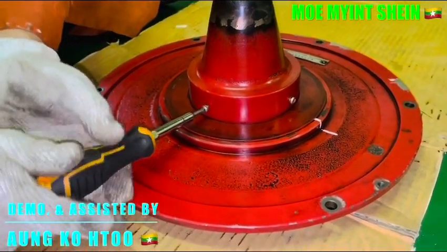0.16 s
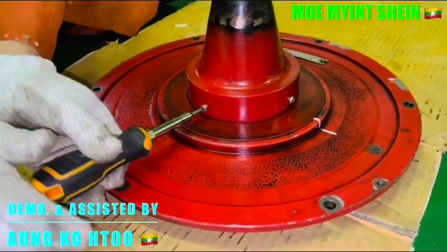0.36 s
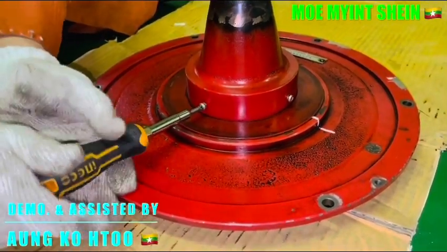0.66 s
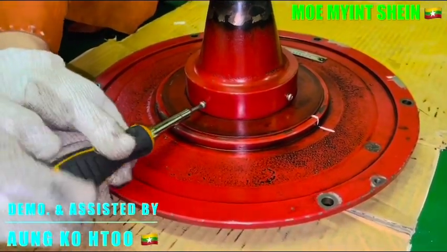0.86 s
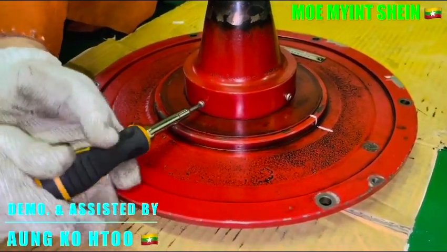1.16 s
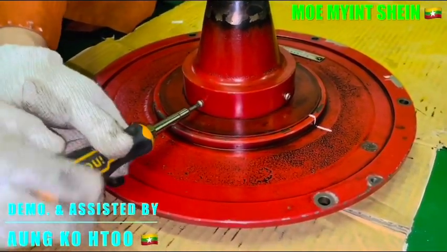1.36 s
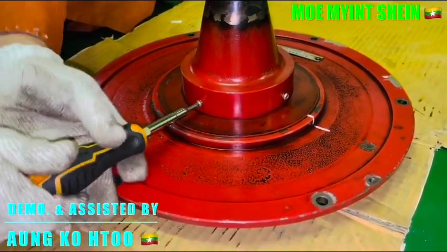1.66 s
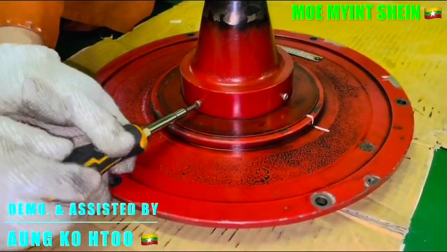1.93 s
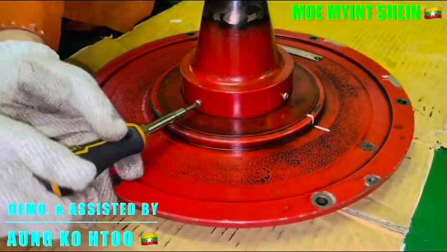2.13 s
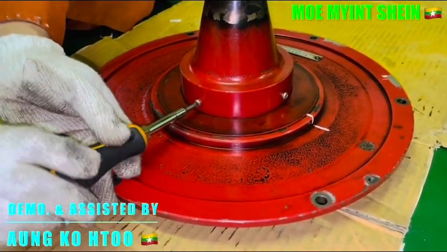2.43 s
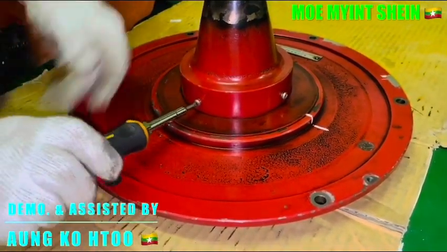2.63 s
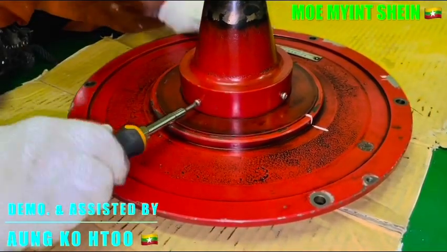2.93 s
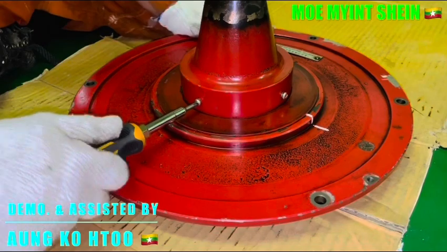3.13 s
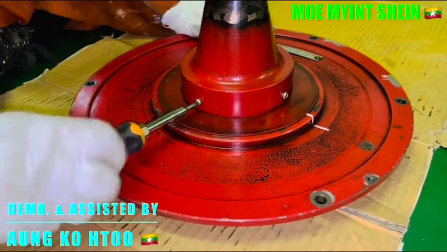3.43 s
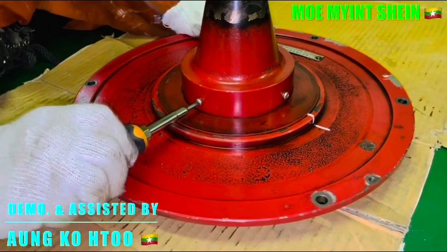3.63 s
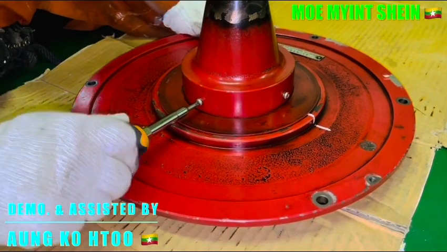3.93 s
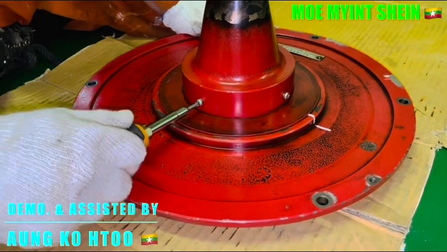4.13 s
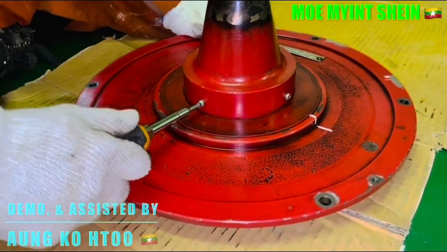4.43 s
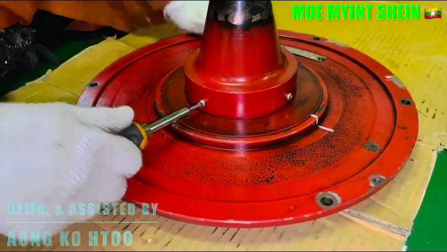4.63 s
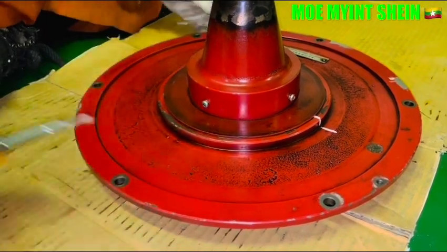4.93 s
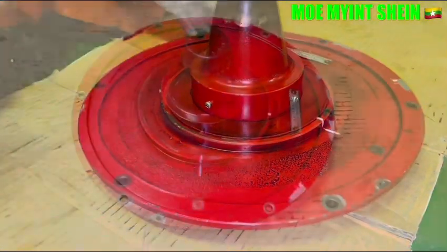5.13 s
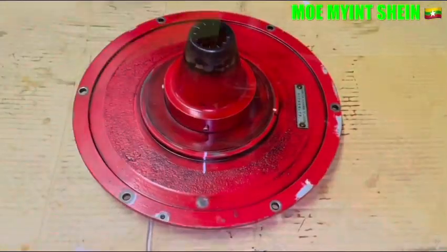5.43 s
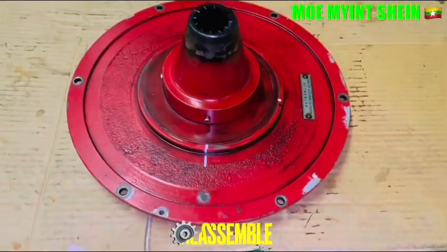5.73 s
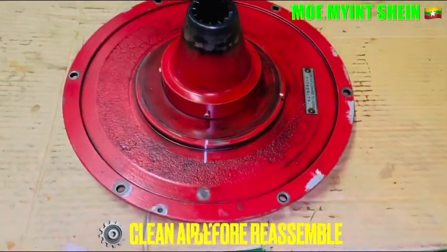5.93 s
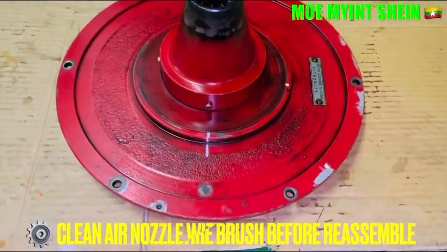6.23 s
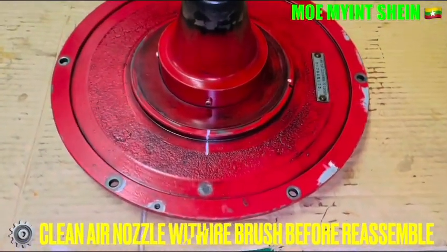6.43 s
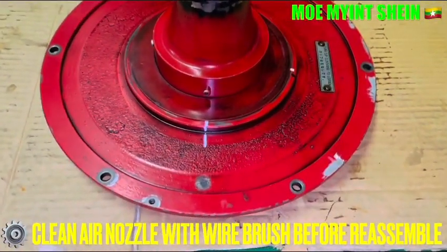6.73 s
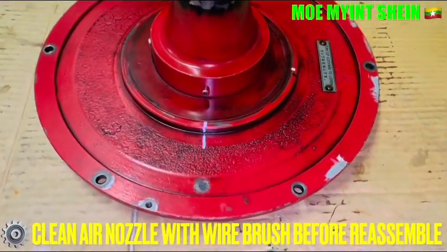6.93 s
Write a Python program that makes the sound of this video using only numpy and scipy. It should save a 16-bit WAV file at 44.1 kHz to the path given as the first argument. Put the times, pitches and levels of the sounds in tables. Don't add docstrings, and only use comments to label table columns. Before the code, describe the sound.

A steady, deep engine-room rumble with a low humming throb, dull ventilation roar and soft low duct moans, unchanged throughout.

```python
import sys
import numpy as np
from scipy import signal
from scipy.fft import rfft, irfft
from scipy.io import wavfile
from scipy.ndimage import uniform_filter1d

SR = 44100
rng = np.random.default_rng(int(sys.argv[2]) if len(sys.argv) > 2 else 0)


def magnitude_from_level(level_db):
    exponent = np.asarray(level_db, float) / 20
    return 10 ** exponent


def generate_wav(sig):
    pcm = np.round(np.clip(np.atleast_2d(sig).T, -1, 1) * 32767).astype(np.int16)
    wavfile.write(sys.argv[1], SR, pcm)


N = 312669


def read(points, hz):
    f, value = np.transpose(points)
    return np.interp(np.log(hz + 1), np.log(f + 1), value)


def noise(power_per_hz):
    spectrum = rfft(rng.standard_normal(N))
    return irfft(spectrum * np.sqrt(power_per_hz * SR / 2), N)


def bump(t, middle, width):
    return np.exp(-((t - middle) / width) ** 2)


def smooth_wander(count, span):
    wander = rng.standard_normal(count)
    for _ in range(2):
        wander = uniform_filter1d(wander, size=span)
    return wander / wander.std()


def engine():
    # order, level_db (rms)
    thump = [(4, -61.2), (5, -48.7), (6, -40.1), (7, -58.6), (8, -46.9), (9, -44.7), (10, -35.3),
             (11, -48.2), (12, -53.9), (13, -48.8), (14, -35.0), (15, -59.4), (16, -62.7), (17, -62.6),
             (18, -62.6), (19, -71.5), (20, -58.9), (21, -65.1), (22, -63.4), (23, -64.9), (24, -65.4),
             (25, -57.8), (26, -65.7), (27, -59.2), (28, -74.1), (29, -58.5), (30, -56.6), (31, -58.9)]
    # order,
    # level_db (rms)
    panels_low = [(34, -62), (36, -75), (37, -61), (38, -65.5), (39, -64), (42, -66), (45, -66),
                  (47, -67.5), (51, -68), (54, -66), (60, -69), (61, -70)]
    panels_mid = [(59, -75.5), (62, -82), (63, -73), (66, -72), (71, -74), (89, -74), (103, -76),
                  (126, -78.5), (136, -74), (140, -76.5), (144, -72.5), (151, -72), (155, -76.5)]
    panels_high = [(158, -74), (168, -78), (170, -78.5), (188, -79.5), (202, -82), (220, -81), (224, -83),
                   (227, -82), (251, -82), (372, -95), (375, -95), (379, -95), (381, -91)]
    # frequency_hz, level_db (rms)
    knock = [(250, -65.5), (330, -72), (450, -72), (560, -84.5), (640, -81), (760, -81.5), (880, -88.5),
             (1100, -84), (1400, -91), (1800, -90.5), (2050, -100), (2500, -99), (2850, -100), (3600, -108)]
    cycle_hz = 7.4814
    size = 2 ** 16
    order = np.arange(size // 2 + 1)

    real, imag = rng.standard_normal((2, len(order)))
    chance = real + 1j * imag
    knocking = irfft(magnitude_from_level(read(knock, order * cycle_hz)) * chance / np.sqrt(2), size)
    angle = 2 * np.pi * np.arange(size) / size
    firing = 1 + 0.37 * np.cos(4 * angle - 1.5) + 0.17 * np.cos(angle - 2.5)
    cycle = rfft(knocking * firing)
    cycle[(order < 32) | (order > 480)] = 0
    for k, level_db in thump + panels_low + panels_mid + panels_high:
        cycle[int(k)] = magnitude_from_level(level_db) * np.exp(1j * np.angle(chance[int(k)]))

    low = order < 16
    hz = order[low] * cycle_hz
    lag = 1.25 * (np.arctan((hz - 60) / 0.8) - np.arctan((hz - 70.5) / 0.8))
    cycle[low] = abs(cycle[low]) * np.exp(1j * (3.8 * order[low] + 2.13 - lag))
    shape = irfft(cycle, size) * size / np.sqrt(2)

    t = np.arange(N) / SR
    hunting = 0.0009 * np.cos(2 * np.pi * (t - 0.2) / 6.6)
    position = (cycle_hz * t + hunting) % 1 * size
    return np.interp(position, np.arange(size + 1), np.append(shape, shape[0]))


def pump():
    # shaft_hz, once_db (rms once a turn), twice_db (rms twice a turn), start_rad
    shaft = (59.15, -44.5, -55.2, 2.95)
    shaft_hz, once_db, twice_db, start_rad = shaft
    angle = 2 * np.pi * shaft_hz * np.arange(N) / SR + start_rad
    once = magnitude_from_level(once_db) * np.cos(angle)
    twice = magnitude_from_level(twice_db) * np.cos(2 * angle + 1)
    return np.sqrt(2) * (once - twice)


def motors():
    # frequency_hz, level_db (rms)
    tones = [(41.77, -54.3), (44.16, -52.6), (87.83, -54.1), (95.79, -58.8), (98.59, -59.8),
             (138.03, -63.4), (416.31, -75.8), (701.71, -79.4), (763.84, -76.7), (819.82, -73.4),
             (1052.57, -75.4), (1085.88, -77.7), (1102.5, -84.9), (1302.89, -81.1), (1539.7, -81.2),
             (1695.75, -81.1)]
    t = np.arange(N) / SR
    out = np.zeros(N)
    for (hz, level_db), (phase, rate, start) in zip(tones, rng.random((len(tones), 3))):
        waver_db = 1.3 * np.sin(2 * np.pi * (0.18 * rate * t + start))
        out += np.sqrt(2) * magnitude_from_level(level_db + waver_db) * np.sin(2 * np.pi * (hz * t + phase))
    return out


def ventilation():
    # frequency_hz, density_db (per Hz)
    roar = [(20, -91), (34, -67), (90, -71), (160, -77), (300, -75.5), (420, -87.5), (600, -91), (870, -92),
            (1000, -92), (1850, -94), (2100, -100.5), (2700, -101), (3200, -106.5), (4200, -112)]
    # centre_hz, width_hz, density_db (per Hz)
    ducts = [(42.8, 3.4, -54), (63, 2.4, -61), (73.4, 38, -62), (103.6, 5, -64.5), (119.7, 6, -66.5),
             (140.6, 3.5, -68.5), (175.3, 6.6, -67.5), (199, 9.8, -76.5), (231, 14, -68),
             (275.5, 19, -72.5), (342, 6, -86.5), (396.7, 10, -79), (431, 12, -79), (465.4, 12, -81),
             (783, 20, -89.5), (736, 110, -94.5), (824, 33, -91.5), (1054, 8.4, -89), (2860, 150, -99),
             (3860, 400, -111)]
    hz = np.fft.rfftfreq(N, 1 / SR)
    power = magnitude_from_level(read(roar, hz)) ** 2 / (1 + (hz / 4060.0) ** 8)
    power *= hz > 12
    for centre_hz, width_hz, density_db in ducts:
        power += magnitude_from_level(density_db) ** 2 * np.exp(-4 * np.log(2) * ((hz - centre_hz) / width_hz) ** 2)
    ripple_db = 1.95 * smooth_wander(len(hz), 130) * (hz > 480)
    return noise(power * magnitude_from_level(ripple_db) ** 2)


def fan_moan():
    # start_s (peak of the gust), level_db (peak), pitch_hz
    surges = [(.32, -51.5, 192.6), (.87, -46.5, 199), (1.05, -56, 199), (1.47, -47, 197.3),
              (2.27, -46.5, 198), (2.661, -56, 199), (2.819, -52.5, 202.4), (3.22, -50, 198.3),
              (4.041, -52.5, 199), (4.3, -51.5, 199), (4.551, -51.5, 199), (4.8, -49.5, 199),
              (4.969, -50.5, 199), (5.62, -47, 198), (6.44, -54, 203), (6.6, -54, 199), (1.15, -52.5, 237),
              (1.4, -53, 231.7), (1.62, -51, 231.4), (2.4, -54, 237.3), (3.6, -53, 230), (3.82, -51, 231),
              (6.8, -50, 234.6)]
    # pitch_hz, level_db (rms), fade_db, middle_s, half_length_s
    hum = (268, -58, -4.5, 3.5, 0.9)
    surge_s = 0.12
    t = np.arange(N) / SR
    moan = np.zeros(N)
    for peak_s, level_db, pitch_hz in surges:
        moan += magnitude_from_level(level_db) * bump(t, peak_s, surge_s) * np.sin(2 * np.pi * pitch_hz * (t - peak_s))
    hum_hz, hum_db, fade_db, middle_s, half_length_s = hum
    turns = np.cumsum(hum_hz + 0.3 * smooth_wander(N, 3000)) / SR
    hum_level = magnitude_from_level(hum_db + fade_db * bump(t, middle_s, half_length_s))
    return np.sqrt(2) * (moan + hum_level * np.sin(2 * np.pi * turns))


def air_leak():
    # frequency_hz, density_db (per Hz)
    leak = [(2500, -118), (4000, -115), (5500, -115), (8500, -117.5), (10300, -121.5), (12300, -116),
            (14000, -119), (15700, -122), (22050, -124)]
    # middle_s, rise_db
    puffs = [
        (1.2, 0.5),
        (3.1, 2.1),
        (3.95, 2.0),
        (5.0, 1.3),
        (6.07, 2.5),
        (6.98, 1.2),
    ]
    # start_s, level_db (peak)
    ticks = [
        (3.226, -63),
    ]
    puff_s, rest_db = 0.28, -0.14
    hz = np.fft.rfftfreq(N, 1 / SR)
    t = np.arange(N) / SR
    hiss = noise(magnitude_from_level(read(leak, hz)) ** 2 * (hz > 1500))
    hiss *= magnitude_from_level(rest_db + sum(rise_db * bump(t, middle_s, puff_s) for middle_s, rise_db in puffs))
    u = np.arange(64) / SR
    for start_s, level_db in ticks:
        tick = magnitude_from_level(level_db) * np.exp(-u / 0.0003) * rng.standard_normal(len(u))
        hiss[round(start_s * SR):][:len(u)] += tick
    return hiss


def scene():
    return (engine() + pump() + motors() + ventilation() + fan_moan() + air_leak())[None]


def low_pass(x):
    return signal.sosfilt(signal.butter(12, 15760, fs=SR, output="sos"), x)


def record(dry):
    return low_pass(dry)


dry = scene()
out = record(dry)
generate_wav(out)
```